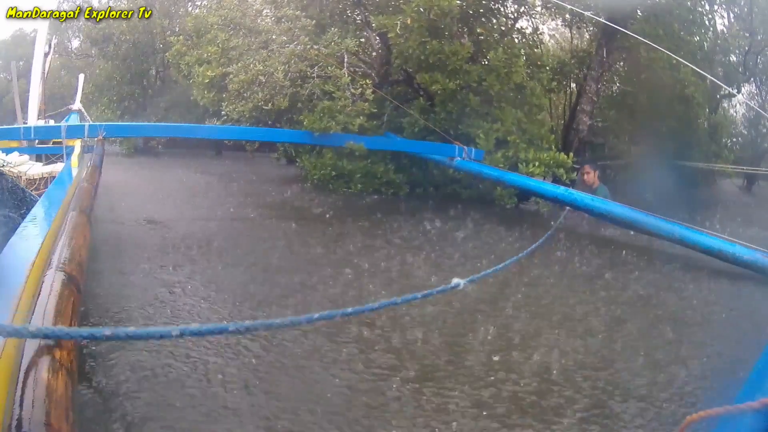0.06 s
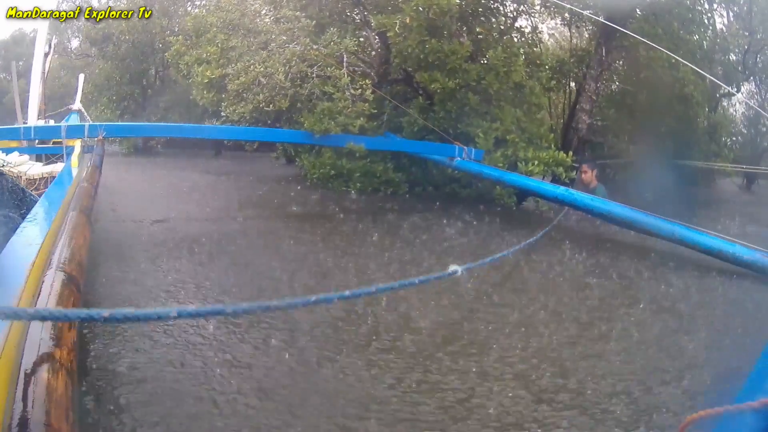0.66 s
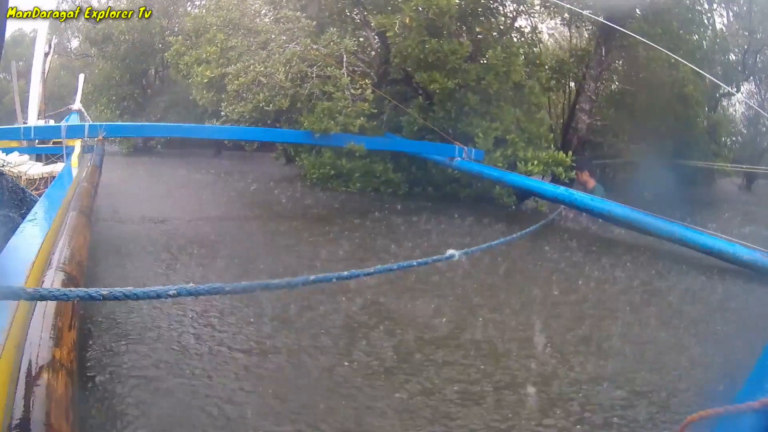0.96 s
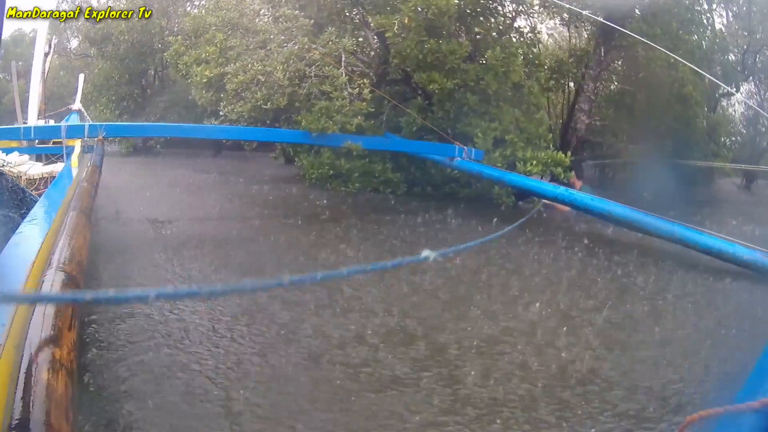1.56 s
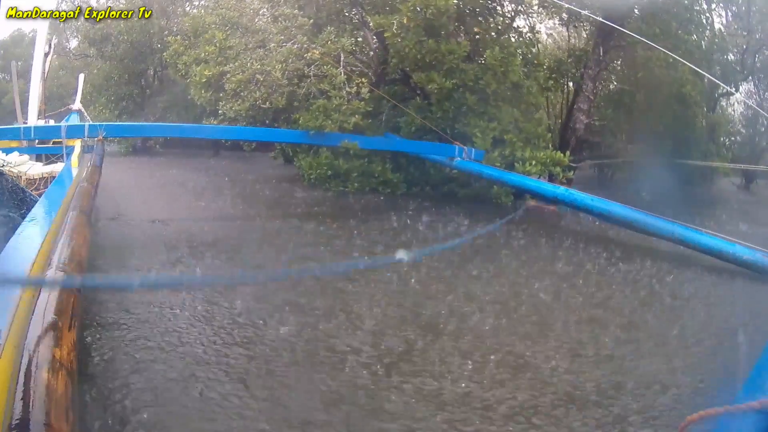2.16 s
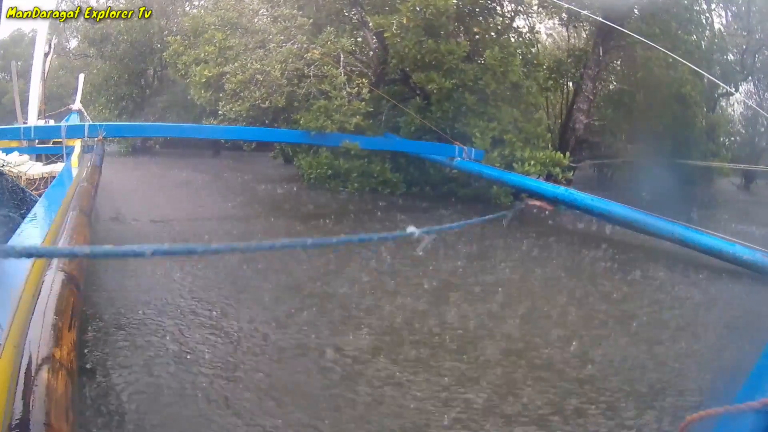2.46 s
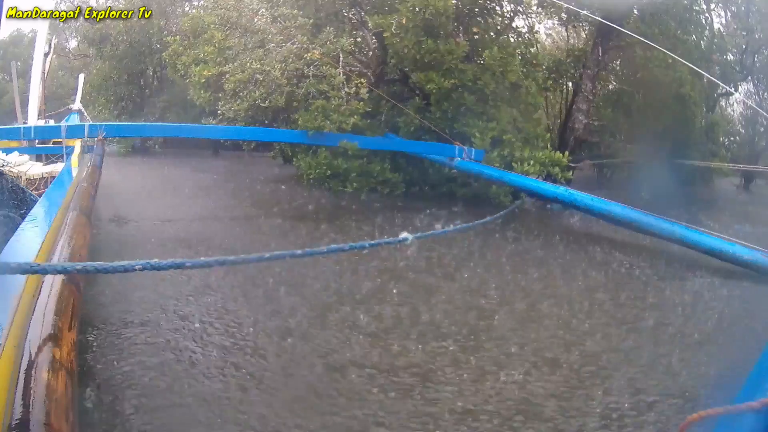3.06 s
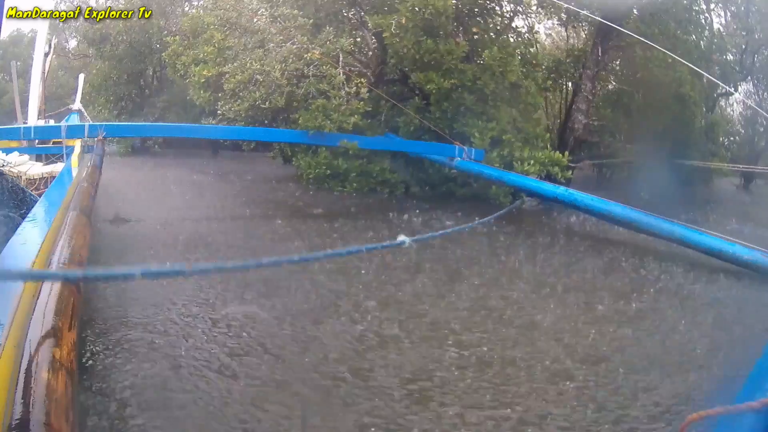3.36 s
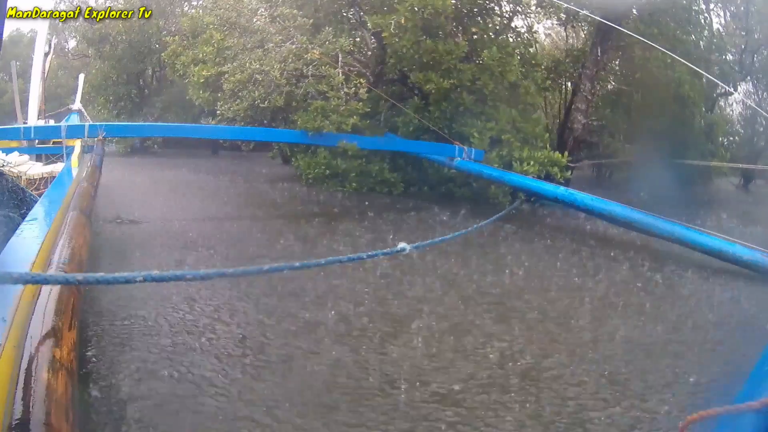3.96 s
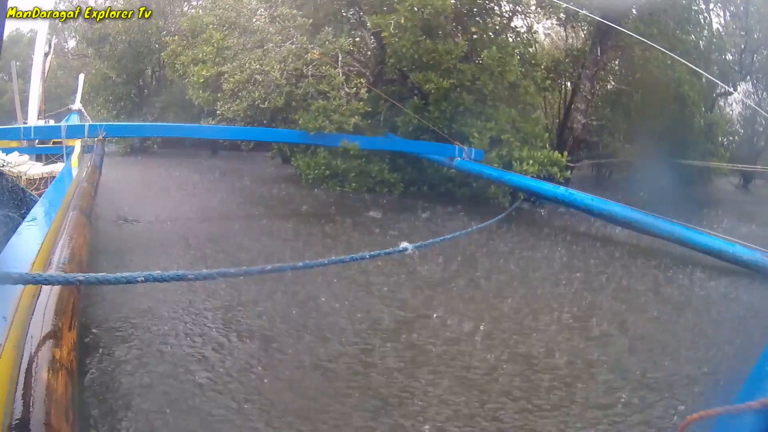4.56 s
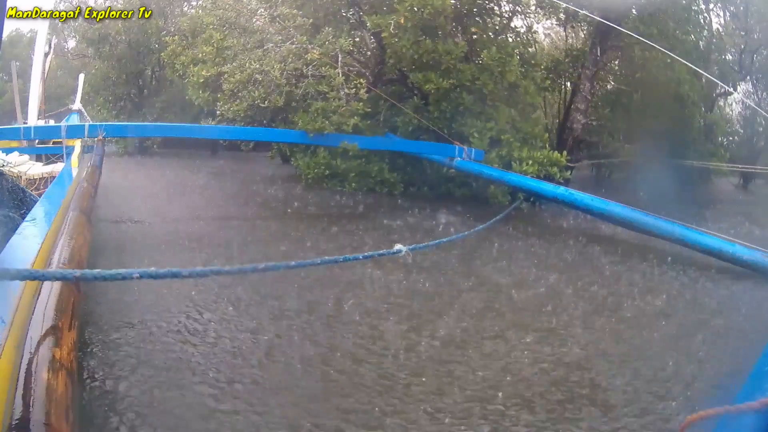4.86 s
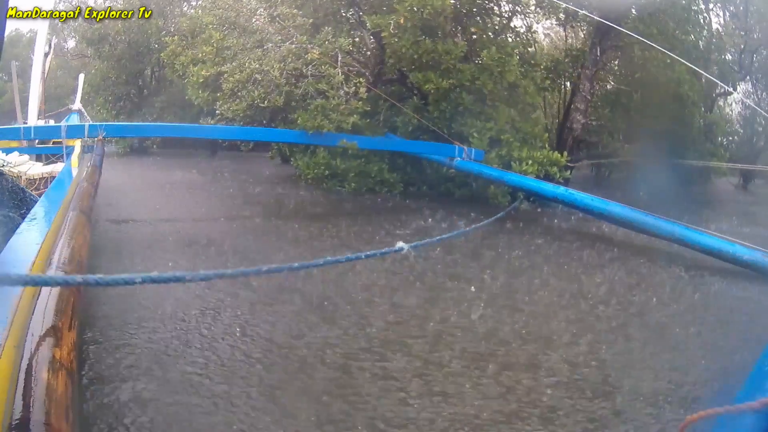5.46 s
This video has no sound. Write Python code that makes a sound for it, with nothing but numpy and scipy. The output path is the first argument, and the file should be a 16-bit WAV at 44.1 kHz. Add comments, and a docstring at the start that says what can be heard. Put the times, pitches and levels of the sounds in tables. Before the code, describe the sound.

A muffled, boxy wash of heavy rain on water runs throughout, heard from inside a waterproof camera case on a boat outdoors. Over it, close drops strike the case at uneven intervals: light splashy ticks, hollow pitched knocks and occasional heavier thumps that shake the mount. The hiss dips briefly just past the middle, then the knocks come louder, the hardest slightly distorted.

```python
"""Heavy rain on a mangrove creek, heard from a wooden boat through a camera's closed waterproof case.
Countless drops on water and leaves merge into a hiss, which the case colours hollow and dull.
Single drops strike the case and its mount: they tick, knock, ring and thump, and the hardest
overload the microphone. The camera's electronics whine faintly."""
import sys
import numpy as np
from scipy import signal
from scipy.fft import rfft, irfft, next_fast_len
from scipy.io import wavfile

SR = 44100
rng = np.random.default_rng(int(sys.argv[2]) if len(sys.argv) > 2 else 0)


def unload_wav(signal):
    """Save mono or channel-first audio to the path in sys.argv[1] as 16-bit WAV at rate SR, clipped to [-1, 1]."""
    wavfile.write(
        sys.argv[1],
        SR,
        np.round(np.clip(np.atleast_2d(signal).T, -1, 1) * 32767).astype(np.int16),
    )


N = 246959
TIME_S = np.arange(N) / SR
AGE_S = np.arange(4096) / SR   # since a drop's impact

# Table levels are relative.
# rain on water through the case wall: f/Hz, level/dB
HISS_SPECTRUM = [(30, -13.5), (200, -13), (520, -5), (750, -14), (950, -14.5), (1400, -4.5), (1850, -11),
                 (2300, -21.5), (2800, -27), (4500, -35), (5200, -43.5), (7200, -48), (10000, -47),
                 (15500, -50)]
# case resonances: f/Hz, width/Hz, lift/dB
CASE_RESONANCES = [(374.5, 84, 7.5), (502, 46, 1.5), (1380, 186, 5.5), (1727, 200, 5.5), (2880, 140, 2.5),
                   (3700, 350, 6), (4310, 530, 8), (6200, 1900, 7.5)]
# splash on the case: f/Hz, level/dB
SPLASH_SPECTRUM = [(100, -68), (700, -5.5), (1500, -0.5), (1850, 5), (2350, -5), (2750, 4), (3020, 7),
                   (3550, -3), (3780, 3.5), (4780, 3.5), (5150, -6), (6400, -11.5), (9000, -19),
                   (16000, -29)]
# electronic tones: f/Hz, level/dB
WHINE_TONES = [(8979, -82), (9055, -89), (11536, -89)]
# gain on wash and ticks, one brief dip, end values held: t/s, level/dB
BED_GAIN = [(3.05, 3.5), (3.085, -2.5), (3.2, -2), (3.222, 2.5)]
# modes of shell, stiff corners, flat panel and mount: f/Hz, level/dB, t60/s
SHELL_MODES = [(399.3, -20.5, 0.057), (970, -15.5, 0.014), (1270, -1, 0.023), (1574, -3, 0.015)]
CORNER_MODES = [(2184, -1, 0.014), (2510, -9, 0.014)]
PANEL_MODES = [(372, -22.5, 0.068), (630.8, -5, 0.057), (1260, 0.5, 0.021), (1628, -1, 0.031)]
MOUNT_MODES = [(65.5, -19.5, 0.074), (147.3, -0.5, 0.074), (224, 1.5, 0.0084)]
# drops on the shell, softer contact = lower top: t/s, knock/dB, splash/dB, splash top/Hz
SHELL_DROPS = [(0.2012, -26, -22, 3480), (0.2245, -20.5, -20.5, 5000), (0.3927, -26, -22.5, 3500),
               (0.4763, -24.5, -21.5, 2830), (0.6433, -16, -21, 5550), (0.782, -19, -16, 2300),
               (0.934, -18.5, -17, 2500), (0.9454, -30, -6, 3800), (1.095, -16, -11, 3500),
               (1.1294, -18, -9, 2400), (1.3022, -24.5, -16.5, 2500), (1.745, -21, -12, 3800),
               (1.8704, -15.5, -11, 2700), (1.88, -20, -16, 3500), (1.9515, -16.5, -8, 3600),
               (2.0752, -23.5, -9.5, 2400), (2.2889, -17, -16, 2500), (2.5358, -17.5, -13.5, 2500),
               (2.5596, -18, -10.5, 2700), (2.6112, -15, -9.5, 2700), (2.6519, -26, -19, 3200),
               (2.8163, -18, 0.5, 3300), (2.8253, -13.5, -6.5, 2300), (3.3645, -14, -8, 3300),
               (3.3938, -10, 5, 2940), (3.6268, 1, -11, 9000), (3.6334, -18, -15, 3200),
               (3.676, -11, -12, 2400), (3.7312, -16, -0.5, 7000), (3.7464, -12.5, -6.5, 2600),
               (3.9765, -21.5, -19, 4200), (4.044, -15.5, -13, 3500), (4.1705, -10.5, -6, 4200),
               (4.2282, -20, -30, 3500), (4.2434, -7, -22, 3500), (4.4041, -13, -8.5, 2000),
               (4.443, -20, -17, 2100), (4.566, -2, -3, 4400), (4.641, -6, -6.5, 2700),
               (4.9575, -11.5, -10.5, 3200), (5.0375, -10.5, -9.5, 2500), (5.2881, -5, -0.5, 2200),
               (5.5002, -7, -9, 4000), (5.5385, -15, -2, 2500), (5.5446, -6.5, -3.5, 1900)]
# drops on the panel: t/s, ring/dB, splash/dB
PANEL_DROPS = [(0.6876, 5, 7), (1.1373, -13, -12.5), (1.1449, -11, -17), (1.3607, -16, -17.5),
               (1.7218, -3.5, -17), (2.4683, -14, -21), (2.9364, 0, 1.5), (3.0393, 1.5, -11),
               (3.2741, -20, -13.5), (3.6636, -7.5, -12), (3.9185, -13.5, -21.5), (4.1539, -9, -11),
               (5.22, -20.5, -12.5)]
# drops that shake the mount: t/s, thump/dB, knock/dB, panel ring/dB, splash/dB
MOUNT_DROPS = [(0.869, -21, -18, -24.5, -21), (1.1748, -8.5, -18.5, -10, -11.5),
               (1.7536, 0.5, -4.5, -23, 5), (1.7634, -6.5, -18, -20, 0.5), (1.779, -24, -14.5, -40, -13),
               (2.9935, -20, -9.5, -36, -7.5), (4.0788, -6.5, 0.5, -18.5, 3),
               (4.1753, -12, -3.5, -18.5, -18), (4.37, -11.5, -17, -27, -19.5),
               (4.6877, -2.5, -1, -4.5, -3.5), (4.9988, -5.5, 5, -10.5, 3)]


def from_db(db):
    """Decibels to gain."""
    return 10 ** (np.asarray(db) / 20)


def unit_rms(x):
    """Scale to rms 1."""
    return x / np.sqrt(np.mean(x ** 2) + 1e-20)


def add(out, t_s, sound):
    """Mix a sound in at t_s."""
    start = int(np.clip(round(t_s * SR), 0, N - 1))
    out[start:start + len(sound)] += sound[:N - start]


def drift(rate_hz):
    """Random wander, rms 1."""
    knots = rng.standard_normal(4000)
    return unit_rms(np.interp(TIME_S * rate_hz, np.arange(len(knots)), knots))


def colour(x, spectrum, resonances=()):
    """Minimum-phase filter, unit power gain, from a spectrum and resonant lifts."""
    size = 2 * next_fast_len(len(x) // 2 + len(AGE_S))
    hz = np.arange(size // 2 + 1) * SR / size
    points_hz, points_db = np.transpose(spectrum)
    db = np.interp(np.log(hz + 1), np.log(points_hz), points_db)
    for centre_hz, width_hz, lift_db in resonances:
        db = db + lift_db / (1 + (2 * (hz - centre_hz) / width_hz) ** 2)
    cepstrum = irfft(np.log(from_db(db)))
    response = np.exp(rfft(2 * cepstrum[:size // 2], size))
    response /= np.sqrt(np.mean(np.abs(response) ** 2))
    return irfft(rfft(x, size) * response)[:len(x)]


def dull(x, top_hz):
    """One-pole low-pass: a soft, wet contact."""
    return signal.sosfilt(signal.butter(1, top_hz, fs=SR, output="sos"), x)


def impacts(per_s, spread_db, max_spreads):
    """Random clicks, many small, few large; rms 1."""
    sizes = from_db(spread_db * np.minimum(rng.exponential(1, N), max_spreads))
    signs = rng.choice([-1, 1], N)
    return unit_rms(sizes * signs * (rng.random(N) < per_s / SR))


def rain_on_water(level_db, near_db, flutter_db):
    """Distinct near drops over a smooth wash of far ones, heard through the case."""
    far = rng.standard_normal(N)
    near = from_db(near_db) * impacts(per_s=2500, spread_db=3.5, max_spreads=2.94)
    gain = from_db(level_db + flutter_db * drift(rate_hz=27))
    return gain * colour(unit_rms(far + near), HISS_SPECTRUM, CASE_RESONANCES)


def patter(level_db, t60_s, top_hz):
    """Fine droplets on the case: short splashes through its resonances."""
    clicks = impacts(per_s=70, spread_db=6.5, max_spreads=1.55)
    decay = from_db(-60 * AGE_S / t60_s)
    power = signal.fftconvolve(clicks ** 2, decay ** 2)[:N]
    spray = np.sqrt(np.abs(power)) * rng.standard_normal(N)
    inside = colour(spray, SPLASH_SPECTRUM, CASE_RESONANCES)
    return from_db(level_db) * unit_rms(dull(inside, top_hz))


def whine():
    """Thin steady tones of the camera's electronics."""
    return sum(np.sqrt(2) * from_db(db) * np.sin(2 * np.pi * hz * TIME_S) for hz, db in WHINE_TONES)


def splash(spray_gain, t60_s):
    """A drop's impact, then spray as it flattens; unit energy."""
    burst = spray_gain * rng.standard_normal(len(AGE_S)) * from_db(-60 * AGE_S / t60_s)
    burst[0] += 1
    return burst / np.linalg.norm(burst)


def struck(modes, detune, uneven_db=0.7):
    """One blow: damped sines, each scattered in pitch and strength."""
    hz, db, t60_s = np.transpose(modes)[:, :, None]
    pitch, strength = rng.standard_normal((2, len(modes), 1))
    signs = (-1) ** np.arange(len(modes))[:, None]
    envelope = from_db(db + uneven_db * strength - 60 * AGE_S / t60_s)
    return np.sum(signs * envelope * np.sin(2 * np.pi * hz * (1 + detune * pitch) * AGE_S), axis=0)


def drop(splash_db, top_hz, knock_db, ring_db, thump_db):
    """One drop splashes and rings shell, corners, panel and mount; levels relative."""
    wet = colour(dull(splash(spray_gain=0.35, t60_s=0.011), top_hz), SPLASH_SPECTRUM)
    clack = np.hypot(from_db(knock_db - 4.5), from_db(splash_db - 15))   # both drive the corners
    return (from_db(splash_db + 10.5) * wet
            + from_db(knock_db) * struck(SHELL_MODES, detune=0.044)
            + clack * struck(CORNER_MODES, detune=0.029)
            + from_db(ring_db) * struck(PANEL_MODES, detune=0.0038)
            + from_db(thump_db) * struck(MOUNT_MODES, detune=0.02))


def shell_taps(to_panel_db, to_mount_db):
    """Taps on the shell; little reaches panel or mount."""
    out = np.zeros(N)
    for t_s, knock_db, splash_db, top_hz in SHELL_DROPS:
        add(out, t_s, drop(splash_db, top_hz, knock_db, knock_db + to_panel_db, knock_db + to_mount_db))
    return out


def small_drops(count, level_db, spread_db, top_hz, knock_db, ring_db, thump_db):
    """Light ticks at random times; knock, ring and thump are offsets from the splash setting."""
    out = np.zeros(N)
    for when, size in rng.random((count, 2)):
        db = level_db + spread_db * (2 * size - 1)
        add(out, when * N / SR, drop(db, top_hz, db + knock_db, db + ring_db, db + thump_db))
    return out


def panel_hits(gain_db, top_hz, to_mount_db):
    """Hollow, pitched knocks on the panel over a slight thump; the shell stays still."""
    out = np.zeros(N)
    for t_s, ring_db, splash_db in PANEL_DROPS:
        add(out, t_s, drop(splash_db, top_hz, -np.inf, ring_db, ring_db + to_mount_db))
    return from_db(gain_db) * out


def mount_hits(top_hz):
    """Heavy drops rock the whole case: a low thump under the knock."""
    out = np.zeros(N)
    for t_s, thump_db, knock_db, ring_db, splash_db in MOUNT_DROPS:
        add(out, t_s, drop(splash_db, top_hz, knock_db, ring_db, thump_db))
    return out


def scene():
    """Rain wash with close drops on top; mono."""
    wash = rain_on_water(level_db=-38, near_db=-3.5, flutter_db=1)
    wash += patter(level_db=-57, t60_s=0.035, top_hz=4500)
    wash += whine()
    ticks = small_drops(count=9, level_db=-29, spread_db=2, top_hz=3200,
                        knock_db=-6.5, ring_db=-18, thump_db=-31)
    bed_gain = from_db(np.interp(TIME_S, *np.transpose(BED_GAIN)))
    drops = (shell_taps(to_panel_db=-19, to_mount_db=-47)
             + panel_hits(gain_db=0.4, top_hz=4030, to_mount_db=-21)
             + mount_hits(top_hz=3080))
    return (bed_gain * (wash + ticks) + drops)[None]


def overload(x, knee):
    """Rounded saturation at full scale; higher knee = harder."""
    return x / (1 + np.abs(x) ** knee) ** (1 / knee)


def record(dry):
    """Microphone overload on the hardest drops, then a steep low-pass."""
    cutoff_hz = 15700
    low_pass = signal.ellip(10, 0.1, 70, cutoff_hz, fs=SR, output="sos")
    return signal.sosfilt(low_pass, overload(dry, knee=10.3))


dry = scene()
out = record(dry)
unload_wav(out)
```